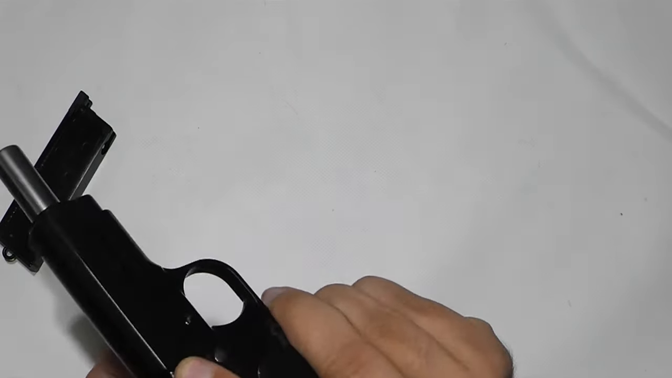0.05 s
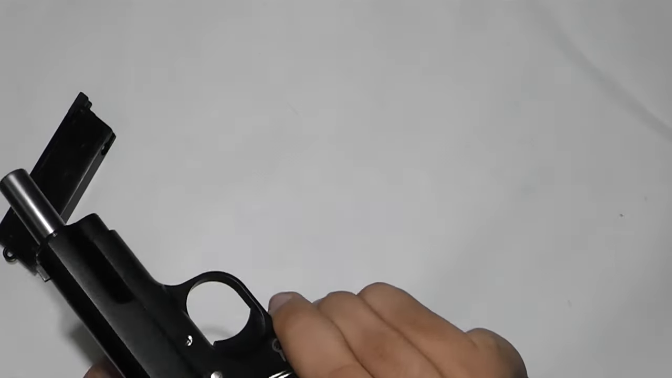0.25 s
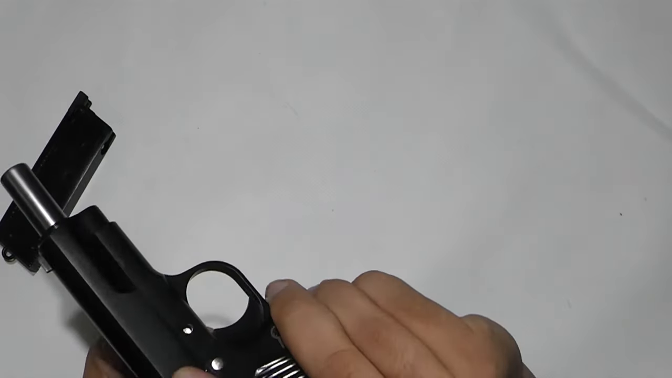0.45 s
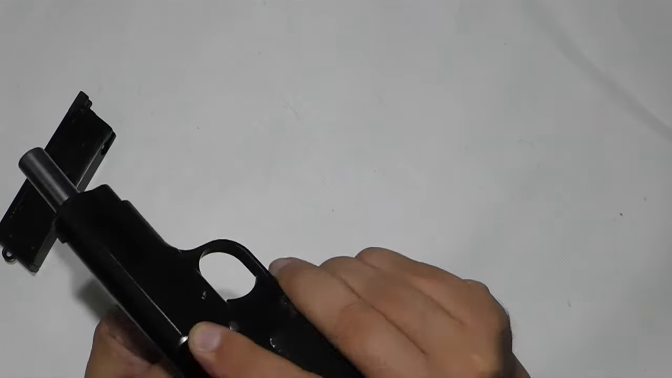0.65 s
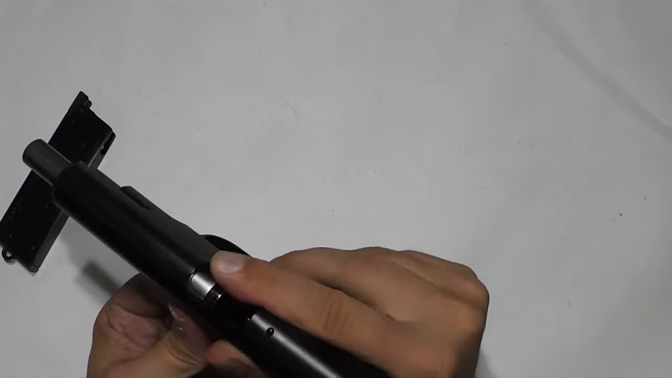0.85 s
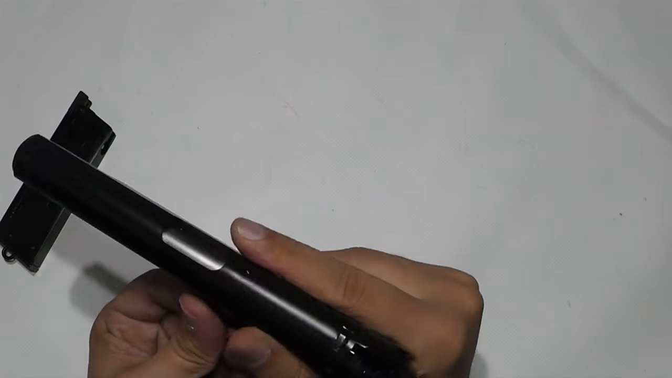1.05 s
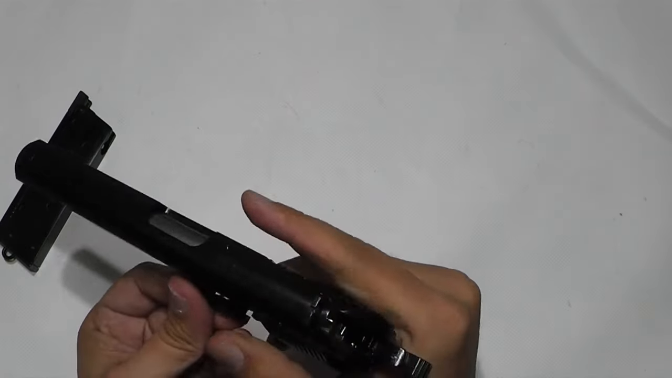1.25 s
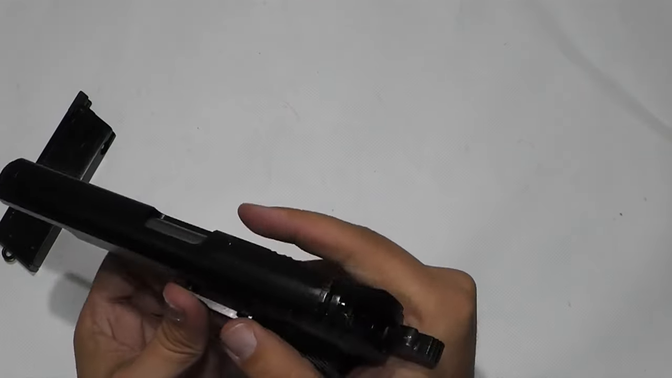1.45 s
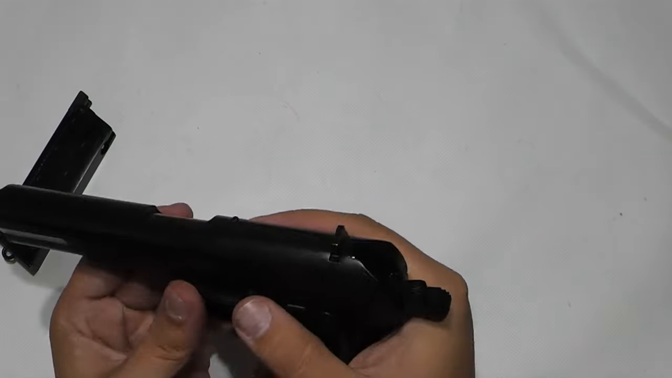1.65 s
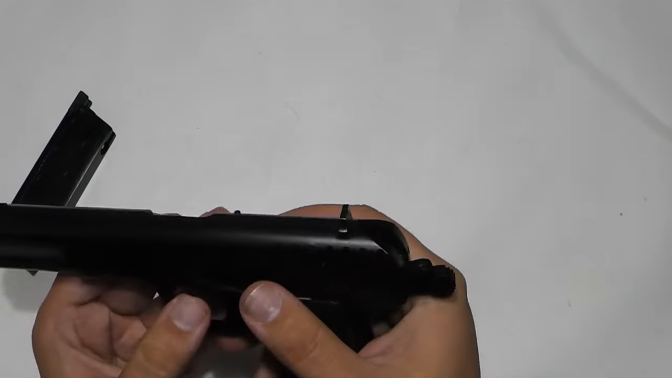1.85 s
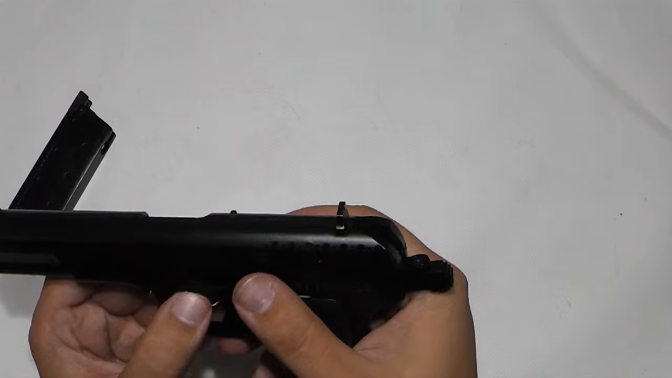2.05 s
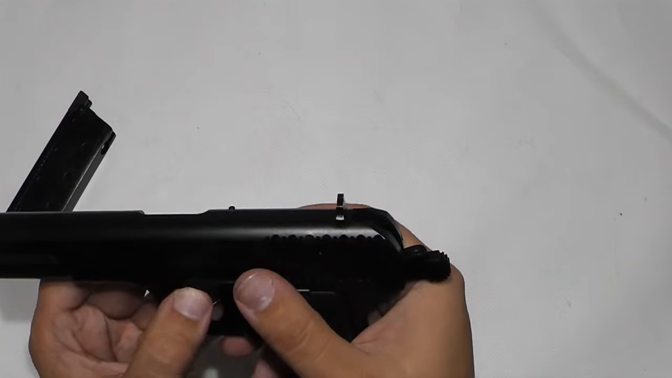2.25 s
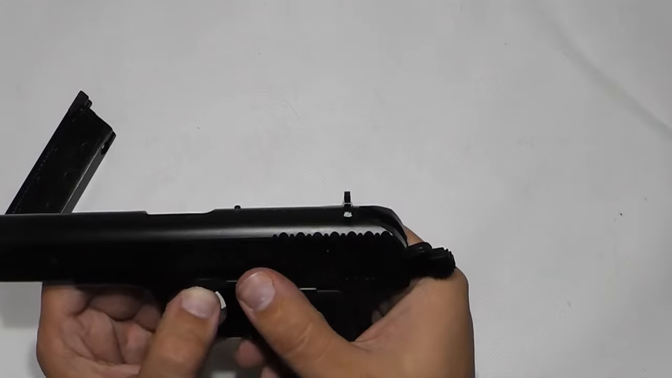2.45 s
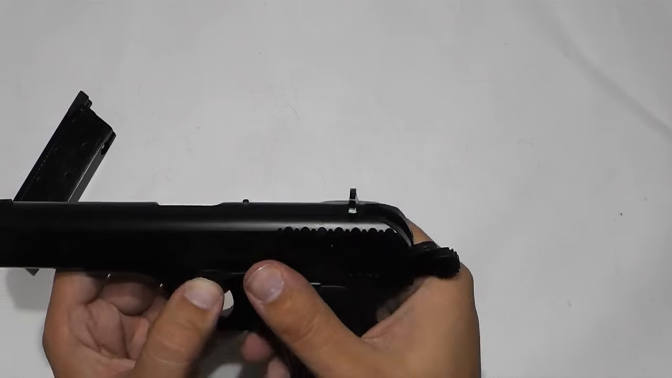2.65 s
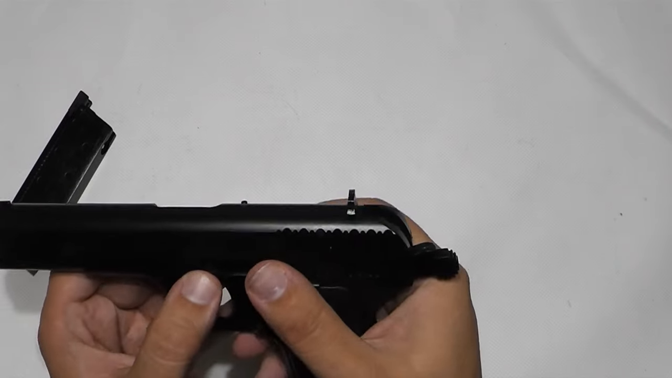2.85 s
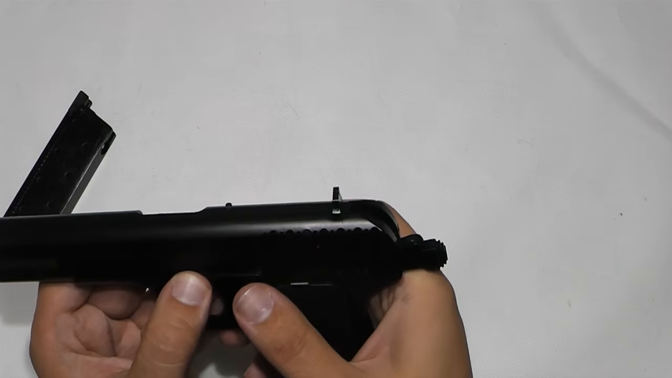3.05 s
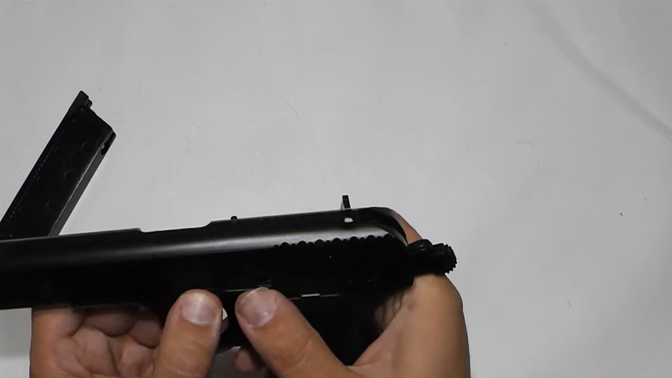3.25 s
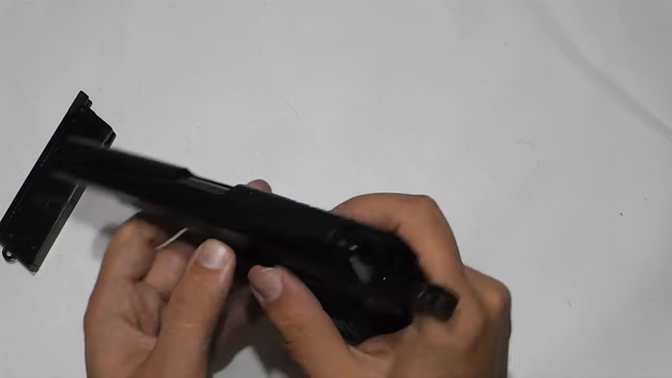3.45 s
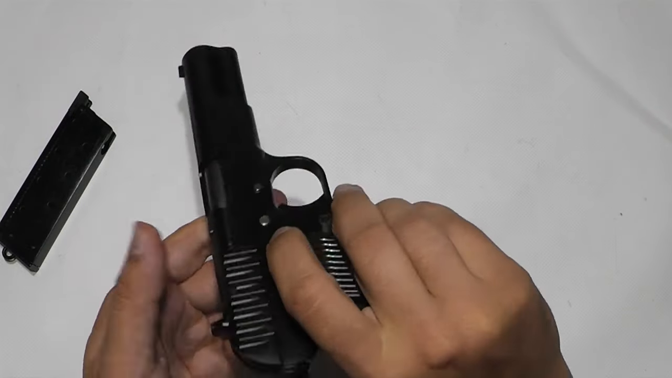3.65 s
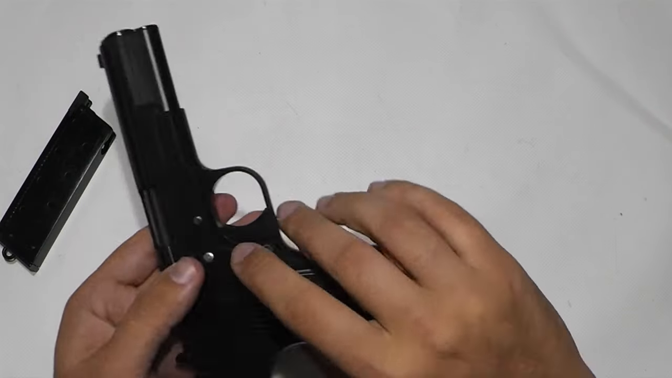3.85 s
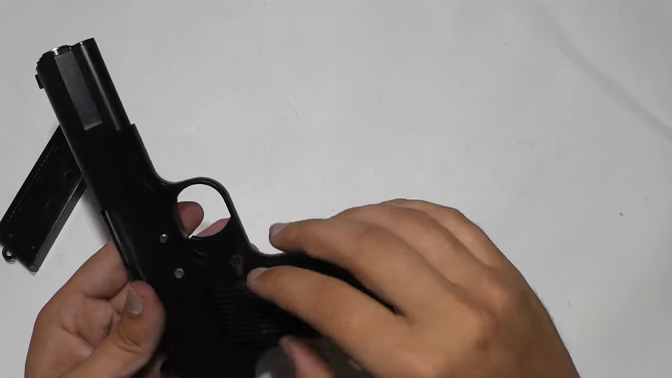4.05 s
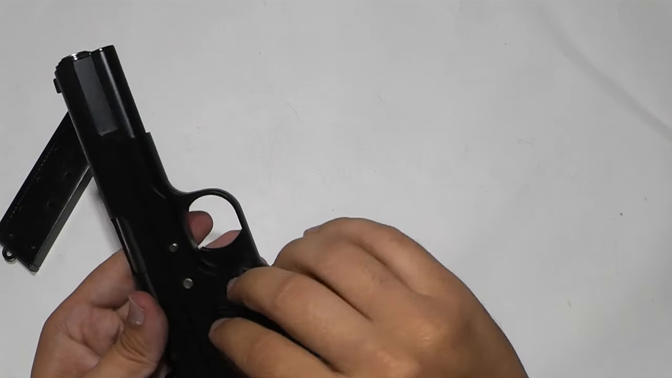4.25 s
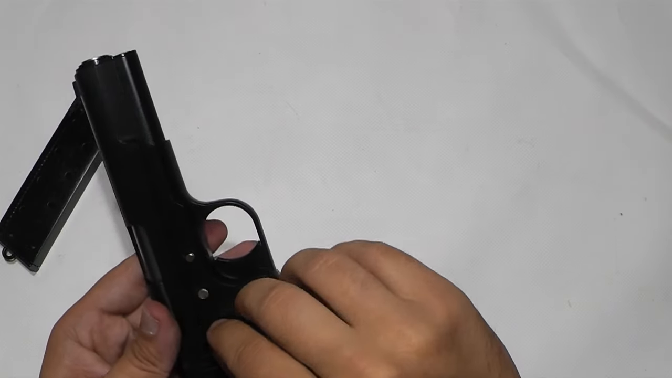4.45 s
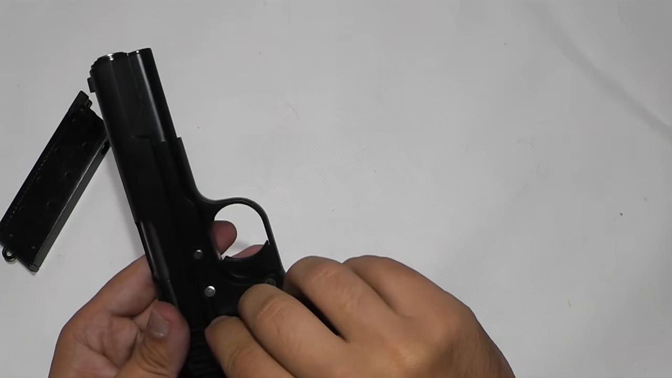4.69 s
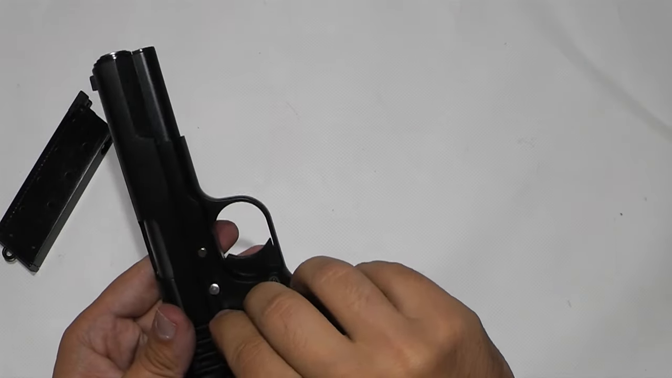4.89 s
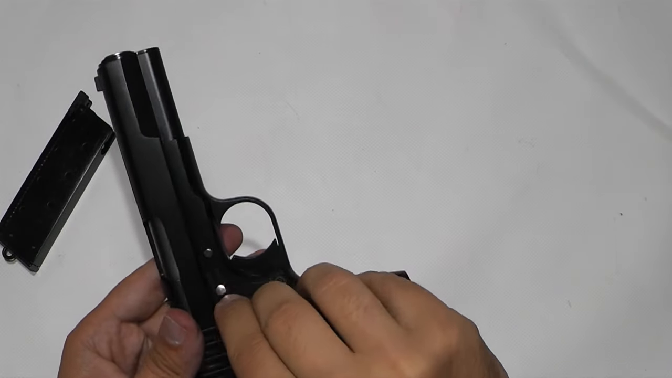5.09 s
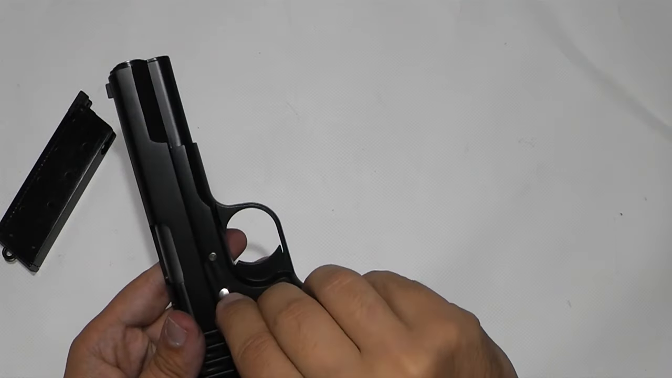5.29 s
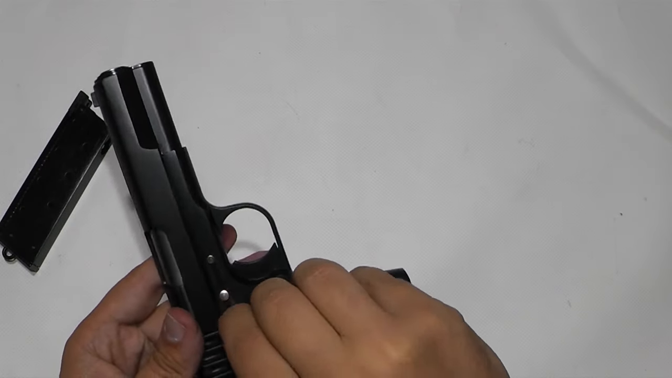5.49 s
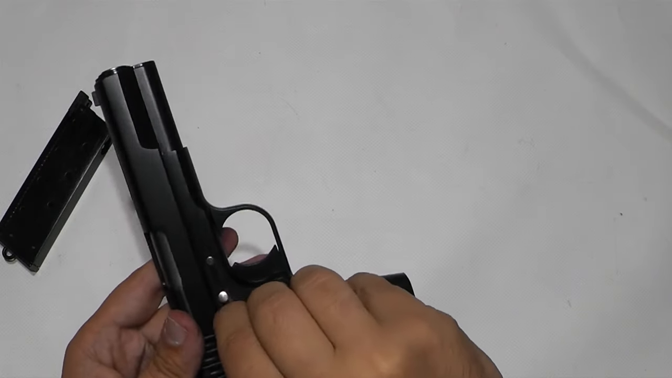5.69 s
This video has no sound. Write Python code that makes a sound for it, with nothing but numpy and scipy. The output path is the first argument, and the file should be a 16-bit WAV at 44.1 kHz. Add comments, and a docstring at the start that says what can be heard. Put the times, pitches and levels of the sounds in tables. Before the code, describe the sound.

A metal pistol is reassembled by hand in a quiet room: small ticks and rubbing, a table knock, a slide clack, a sharp snap.

```python
"""An airsoft pistol is put back together by hand in a small, dry room with a low hum and faint whine.
Parts tick and rub throughout. Early on the grip bumps the table; at about 1.2 s a creak and scrape
lead into the slide's clack, and at 3.1 s the slide stop snaps in. A last part creaks home at 5.2 s.
Hits are short bursts of random contacts that make metal ring, rubbing and room noise are coloured
noise, and reflections made of dying noise put the pistol in the room."""
import sys
import numpy as np
from scipy import signal
from scipy.fft import rfft, irfft
from scipy.io import wavfile
from scipy.ndimage import uniform_filter1d

SR = 44100
rng = np.random.default_rng(int(sys.argv[2]) if len(sys.argv) > 2 else 0)


def file_out(sig):
    """Save sig as 16-bit WAV at sys.argv[1]."""
    # one column per channel
    cols = np.atleast_2d(sig).T
    # limit, then scale
    lim = np.clip(cols, -1, 1)
    pcm = np.round(lim * 32767).astype(np.int16)
    wavfile.write(sys.argv[1], SR, pcm)


N = 252693  # length of the scene in samples
T = np.arange(SR // 2) / SR  # the half second given to each short sound, in seconds


def amp(db):
    """Turns dB into a plain factor."""
    return 10 ** (np.asarray(db) / 20)


def unit(x):
    """Scales to energy 1."""
    return x / np.sqrt(np.sum(x ** 2) + 1e-20)


def read(points, hz):
    """Reads a table between its points, along a logarithmic pitch scale."""
    f, value = np.transpose(points)
    return np.interp(np.log(hz + 1), np.log(f + 1), value)


def add(mix, s, sound):
    """Adds a sound to the mix, starting at s seconds."""
    part = mix[round(s * SR):][:len(sound)]
    part += sound[:len(part)]


def shaped(x, spectrum):
    """Gives steady noise a colour, at rms 1."""
    gain = amp(read(spectrum, np.fft.rfftfreq(N, 1 / SR)))
    return unit(irfft(rfft(x) * gain, N)) * np.sqrt(N)


def drifting(size):
    """A slowly wandering random curve, at rms 1; a larger size in samples wanders more slowly."""
    return unit(uniform_filter1d(rng.standard_normal(N), size=size)) * np.sqrt(N)


def response(spectrum, size=4096):
    """The answer of a body with this colour to one tap: nothing sounds before the tap."""
    log_gain = np.log(amp(read(spectrum, abs(np.fft.fftfreq(size, 1 / SR)))))
    minimum_phase = np.exp(np.conj(signal.hilbert(log_gain)))
    return unit(np.fft.ifft(minimum_phase).real[:size // 2])


def through(x, body):
    """Sends a short sound through a body, at energy 1."""
    return unit(signal.fftconvolve(x, body)[:len(T)])


def evened(x, width_hz=250):
    """Levels the broad humps in the spectrum of a random burst or tail, so a later colour is heard plainly."""
    z = rfft(x, 2 * len(T))
    power = uniform_filter1d(abs(z) ** 2, size=int(width_hz * 2 * len(T) / SR) + 1)
    return unit(irfft(z / np.sqrt(abs(power) + 1e-12))[:len(T)])


def dying(t60s):
    """Countless overlapping resonances or echoes: noise whose bands die at their own speeds."""
    hz, t, z = signal.stft(rng.standard_normal(len(T)), SR, nperseg=256)
    fading = z * amp(-60 * t / read(t60s, hz)[:, None])
    return signal.istft(fading, SR, nperseg=256)[1][:len(T)]


def chatter(t60, first, rise_s=0.00014):
    """A first contact, then a dying rattle of micro-contacts."""
    envelope = amp(-60 * T / t60) * (1 - np.exp(-T / rise_s))
    rattle = unit(rng.standard_normal(len(T)) * envelope)
    return unit(rattle + first * (T == 0))


def resonance(x, hz, t60, share):
    """Lets a share of the sound ring in one damped mode."""
    mode = amp(-60 * T / t60) * np.cos(2 * np.pi * hz * T)
    return x + share * through(x, mode)


def ringing(modes, t60s):
    """The strongest modes of a part, each a tone dying away."""
    tones = 0
    for hz, db in modes:
        fading = amp(db - 60 * T / read(t60s, hz))
        tones = tones + fading * np.sin(2 * np.pi * (hz * T + rng.random()))
    return unit(tones)


def strike(hits, colour, modes, t60s, modes_db, dense_db, swell_s, first):
    """Quickly repeated contacts make a crack, and feed a few strong modes and many weak ones."""
    out, force = np.zeros(N), np.zeros(len(T))
    start, body = hits[0][0], response(colour)
    for s, db, t60 in hits:
        add(force, s - start, amp(db) * chatter(t60, first))
    crack = through(evened(force, width_hz=310), body)
    strong_modes = amp(modes_db) * ringing(modes, t60s)
    weak_modes = amp(dense_db) * through(evened(dying(t60s)), body)
    swell = np.minimum(T / swell_s, 1)
    add(out, start, np.linalg.norm(force) * (crack + (strong_modes + weak_modes) * swell))
    return out


# Colour of the room noise. Each row: pitch in Hz, relative level in dB.
FLOOR = [(25, -10), (42, -9), (62, 0.6), (105, -8), (150, -18), (250, -17), (480, -22), (1100, -20),
         (2000, -27), (2650, -50), (3500, -51), (5000, -41), (10000, -50), (16000, -72)]
# Its whining tones. Each row: pitch in Hz, rms level in dB before the small left-right tilt.
TONES = [(64, -74.5), (1071, -75.5), (1222, -81)]
# How alike the two ears hear it. Each row: pitch in Hz, likeness from 0 (unrelated) to 1 (the same).
LIKENESS = [(60, 1), (130, 0.4), (290, 0.73), (1400, 0.9), (3000, 0), (16000, 0.1)]


def room_noise(floor_db=-62.0, waver_hz=3):
    """Low rumble as coloured noise, alike in both ears in the bass, and a faint wavering fan whine."""
    same = read(LIKENESS, np.fft.rfftfreq(N, 1 / SR))
    a, b = rfft(rng.standard_normal((2, N)))
    mid, side = a * np.sqrt(1 + same), b * np.sqrt(1 - same)
    air = np.array([shaped(irfft(z, N), FLOOR) for z in (mid + side, mid - side)])
    for hz, db in TONES:
        cycles = np.cumsum(hz + waver_hz * drifting(4000)) / SR
        air = air + amp(db - floor_db) * np.sqrt(2) * np.sin(2 * np.pi * cycles)
    return amp(floor_db) * air * amp([[.5], [-.5]])  # left a little louder than right


# How long the room rings. Each row: pitch in Hz, seconds to fall by 60 dB.
ROOM_T60 = [(60, 0.22), (300, 0.05), (1500, 0.2), (5000, 0.21), (9000, .195), (16000, 0.14)]
# Colour of the reflections, where the bass is weak. Each row: pitch in Hz, dB added to wet_db.
ROOM_GAIN = [(60, -11), (350, -8), (800, -2.5), (1500, -6), (3000, 2.5), (9000, -0.5), (16000, 1)]
# Extra colour of their left-right difference. Each row: pitch in Hz, dB added on top, along with side_db.
ROOM_SIDE = [(60, 8.5), (400, 8.5), (1300, 4.5), (2400, -5.5), (4400, 0.5), (8500, -3), (14000, 4.5)]


def room(x, wet_db, side_db, early=1.3, early_s=0.014, delay_s=0.0017, build_s=0.0025):
    """Direct sound plus dense reflections, the strong early ones from the table and hands."""
    onset = np.clip((T - delay_s) / build_s, 0, 1) * (1 + early * np.exp(-T / early_s))
    tails = [evened(dying(ROOM_T60) * onset, width_hz=760) for _ in range(2)]
    hz = np.fft.rfftfreq(2 * len(T), 1 / SR)
    # first row for what both ears share, second for their difference
    gain = amp(wet_db + read(ROOM_GAIN, hz)) * amp([0 * hz, side_db + read(ROOM_SIDE, hz)])
    echoes = irfft(rfft(tails, 2 * len(T)) * gain)[:, :len(T)]
    mid, side = signal.fftconvolve(x[None], echoes, axes=1)[:, :N]
    return np.array([x + mid + side, x + mid - side]) / np.sqrt(1 + amp(wet_db) ** 2)


def stroke(start, length, attack_s=0.011, release_s=0.027):
    """A hand movement sets in, holds and dies away."""
    t = np.arange(N) / SR - start
    return np.clip(t / attack_s, 0, 1) * np.exp(-np.maximum(t - length, 0) / release_s)


# The hands shifting their hold. Each row: start in seconds, length in seconds,
# rms level of rubbing metal in dB, rms level of brushing skin in dB (both before the room).
STROKES = [(0, 0.11, -75.5, -88), (0.319, .42, -67, -66.5), (0.782, .19, -68, -69),
           (1.049, .08, -68.5, -68), (3.52, 0.59, -79, -76.5), (4.17, 0.47, -101.5, -69.5),
           (4.857, 0.056, -83, -72), (5.337, 0.33, -79.5, -76)]
# Colour of metal rubbing on metal. Each row: pitch in Hz, relative level in dB.
RUB = [(150, -15), (500, -7.5), (1100, 0), (2000, 2), (2900, -22.5), (4300, 1.5), (6500, -1), (9500, -1),
       (12500, -7), (16000, -10.5)]
# Colour of the palm brushing the grip. Each row: pitch in Hz, relative level in dB.
BRUSH = [(60, -13.5), (280, 11), (600, 5.5), (1300, 9), (1900, 9), (2300, -3), (2700, -44), (5500, -20),
         (12000, -45)]
HOLD_METAL_DB, HOLD_SKIN_DB = -87.5, -70  # steady rms level of the hold before the room, under all strokes


def friction(slips_per_s=1500, spread_db=3.0, smooth=.45, uneven_db=2.0):
    """Metal slides in tiny slips under an uneven hand pressure; skin brushes smoothly."""
    sizes = amp(spread_db * np.minimum(rng.exponential(1, N), 5))
    slipping = rng.random(N) < slips_per_s / SR
    slips = rng.standard_normal(N) * (smooth + sizes * slipping)
    pressure_db = uneven_db * np.clip(drifting(900), -2, 2)
    metal = shaped(slips * amp(pressure_db), RUB)
    skin = shaped(rng.standard_normal(N), BRUSH)
    out = amp(HOLD_METAL_DB) * metal + amp(HOLD_SKIN_DB) * skin
    for start, length, metal_db, skin_db in STROKES:
        out += stroke(start, length) * (amp(metal_db) * metal + amp(skin_db) * skin)
    return out


# Parts clicking together. Each row: start in seconds, pitch of the frame's clack in Hz, pitch of the
# steel ring in Hz, clack energy in dB, ring energy in dB before ring_db is added (both before the room).
CLICKS = [(.0334, 1400, 8900, -43, -39), (0.059, 1720, 9800, -37, -37.5), (.2778, 1100, 6030, -24, -45),
          (0.5176, 1800, 5730, -21, -27), (.527, 1170, 4810, -25, -45), (0.6479, 1640, 6400, -21, -19.5),
          (0.684, 1260, 7950, -34, -36), (.882, 1330, 8400, -31, -31.5), (0.9345, 1350, 10500, -31.5, -32),
          (1.043, 1570, 10100, -38, -36.5), (1.128, 1690, 8000, -12.5, -29), (1.1315, 1624, 9180, -18, -24),
          (1.759, 1130, 8120, -55.5, -46), (1.7732, 1980, 4000, -23.5, -30),
          (1.7795, 1875, 3930, -27.5, -48), (1.889, 1510, 3420, -30, -39.5),
          (1.9351, 2024, 4100, -23.5, -23.5), (2.1, 1290, 3855, -35, -40.5), (2.113, 1885, 4500, -23, -33),
          (2.1192, 1930, 4860, -22.5, -21), (2.5684, 1224, 3700, -21, -36.5), (3.06, 1197, 4540, -45, -33),
          (3.5, 1656, 6900, -34, -37.5), (3.523, 1730, 8410, -32.5, -40.5),
          (3.6964, 1411, 6940, -27, -31.5), (4.101, 1441, 8880, -56.5, -51.5),
          (5.214, 1670, 5600, -31, -38), (5.229, 1421, 8680, -25, -29.5), (5.2368, 1290, 9800, -19.5, -15),
          (5.503, 1840, 8780, -25.5, -37.5), (5.517, 1700, 10500, -54, -43.5)]
# Colour of the frame's knock. Each row: pitch in Hz, relative level in dB.
FRAME = [(100, -21.5), (450, -17.5), (800, -4.5), (1200, 0.5), (2000, 1.5), (2900, -12.5), (5000, -30),
         (16000, -50.5)]
# Colour of the ringing steel. Each row: pitch in Hz, relative level in dB.
RING = [(2000, -41), (3100, -10), (4100, 0), (6800, 0.5), (9000, -8.5), (16000, -29.5)]
# Colour of the bright tick, before brightening. Each row: pitch in Hz, relative level in dB.
TICK = [(3000, -27.5), (6000, -8), (8200, 4), (11000, 4), (13000, -11.5), (16000, -11)]
# the smaller the part, the higher it rings and the stronger its tick;
# at EVEN_TICK_HZ the tick level equals the ring level in the table
EVEN_TICK_HZ, TICK_DB_PER_OCTAVE = 6540, 15.5
# light contacts rattle on for CHATTER_T60 seconds; those harder than FIRM_DB seat at once,
# their chatter halving every HALVING_DB
CHATTER_T60, FIRM_DB, HALVING_DB = 0.033, -18.5, 7.5


def clicks(clack_t60=0.013, ring_t60=.004, first=0.14, ring_db=-1, brighten=.4):
    """Each contact knocks the hand-damped frame, rings a steel part and gives a bright tick."""
    out = np.zeros(N)
    frame, ring = response(FRAME), response(RING)
    for s, clack_hz, ring_hz, clack_db, rung_db in CLICKS:
        tick_db = rung_db + TICK_DB_PER_OCTAVE * np.log2(ring_hz / EVEN_TICK_HZ)
        t60 = CHATTER_T60 * .5 ** (max(tick_db - FIRM_DB, 0) / HALVING_DB)
        knock, steel, tip = (evened(chatter(t60, first * CHATTER_T60 / t60), width_hz=600)
                             for _ in range(3))
        # a harder contact is briefer, so it reaches higher
        tick = response([(hz, db + brighten * (tick_db + 25) * (hz > 12000)) for hz, db in TICK])
        knock = resonance(knock, clack_hz, clack_t60, share=0.22)
        steel = resonance(steel, ring_hz, ring_t60, share=.3)
        add(out, s, amp(clack_db) * through(knock, frame))
        add(out, s, amp(rung_db + ring_db) * through(steel, ring))
        add(out, s, amp(tick_db) * through(tip, tick))
    return out


# A tight part forced in. Each row: start in seconds, end in seconds, creak level in dB (the creak climbs
# from 15 to 5 dB below it), rms level of the scrape at the end in dB (both before the room).
CREAKS = [(1.113, 1.172, -42.5, -29), (5.183, 5.234, -42.5, -46.5)]
# Colour of the creak. Each row: pitch in Hz, relative level in dB.
CREAK = [(100, -14), (450, -5.5), (850, -6), (1200, 1.5), (2100, -1.5), (3000, -20), (6000, -21.5),
         (16000, -40.5)]
# Colour of the scrape. Each row: pitch in Hz, relative level in dB.
SCRAPE = [(1000, -14), (2000, -5.5), (3000, -19), (5500, -9.5), (9300, -2), (12500, -16), (16000, -22.5)]
SCRAPE_RISE_DB_PER_S = 477.5


def creaks(slips_per_s=700, rise_db=10, drag=0.16, onset_s=.008):
    """Pressure builds; the part sticks and slips on the frame, scraping ever louder until it gives."""
    out, body, rails = np.zeros(N), response(CREAK), response(SCRAPE)
    for start, end, creak_db, scrape_db in CREAKS:
        t = T[T < end - start]
        grip = rng.standard_normal(len(t)) * np.minimum(t / onset_s, 1)
        slipping = rng.random(len(t)) < slips_per_s / SR
        slips = unit(grip * (drag + slipping)) * np.sqrt(len(t))
        creak = slips * amp(creak_db + rise_db * (t / t[-1] - 1.5))
        scrape = grip * amp(scrape_db - SCRAPE_RISE_DB_PER_S * (t[-1] - t))
        add(out, start, signal.fftconvolve(creak, body))
        add(out, start, signal.fftconvolve(scrape, rails))
    return out


# The grip meeting the table. Each row: start in seconds, energy of the contact in dB,
# seconds for its chatter to fall by 60 dB.
TABLE_HITS = [(.2867, -3, 0.0074), (.2888, -1.5, 0.015), (.2968, -15.5, 0.03), (.301, -7, 0.035)]
# Colour of the contact. Each row: pitch in Hz, relative level in dB.
TABLE = [(25, -7), (200, 1), (350, 2), (600, 6), (950, -3.5), (1500, 1.5), (2200, -11.5), (3200, -24.5),
         (4800, -13.5), (9000, -18.5), (16000, -32)]
# Its strongest modes. Each row: pitch in Hz, relative level in dB.
TABLE_MODES = [(113, -3), (260, -29.5), (350, 7.5), (458, 3), (575, -18), (619, -15), (690, -1), (764, 7),
               (937, 0.5), (1040, -7), (1211, -16), (1400, -8), (1510, -24)]
# How long it rings. Each row: pitch in Hz, seconds to fall by 60 dB.
TABLE_T60 = [(110, 0.7), (350, 0.25), (700, 0.16), (1500, 0.16), (5000, 0.12)]


def table_bump():
    """The grip bumps the table: mostly low modes, with a strong first contact."""
    return strike(TABLE_HITS, TABLE, TABLE_MODES, TABLE_T60,
                  modes_db=-5.5, dense_db=-4.5, swell_s=0.0022, first=0.74)


# The slide stop's contacts. Each row: start in seconds, energy of the contact in dB,
# seconds for its chatter to fall by 60 dB.
STOP_HITS = [(3.0778, 1, 0.044), (3.0818, 2.5, 0.023), (3.0858, 1.5, 0.047), (3.0965, -2, 0.026)]
# Colour of the contact. Each row: pitch in Hz, relative level in dB.
STOP = [(25, 5), (150, 1), (230, -1), (430, 6), (700, -3.5), (950, 3), (1300, 2.5), (1900, 1.5), (2300, -9),
        (3400, -11), (4500, -2), (10200, 3), (12300, -4), (16000, -11)]
# Its strongest modes. Each row: pitch in Hz, relative level in dB.
STOP_MODES = [(360, 7), (460, -6.5), (554, -12), (1216, -1.5), (1749, -0.5), (1954, -2.5), (4010, -2.5),
              (4371, -9.5), (4470, -10), (4898, -11.5), (5108, -3), (5447, -1), (6957, -18), (7044, -10),
              (7227, -9.5), (7418, -9), (7795, -4), (7910, -10), (8161, -5.5), (8432, 3), (8842, 2),
              (9200, -8.5), (9375, 3.5), (9611, 2.5), (9819, -1.5), (10298, -4.5), (10478, -2),
              (10858, -9.5)]
# How long it rings. Each row: pitch in Hz, seconds to fall by 60 dB.
STOP_T60 = [(400, 0.054), (1000, 0.12), (1700, 0.12), (5000, 0.19), (10000, 0.13), (16000, .15)]


def stop_snap():
    """The slide stop snaps in: a rattle of four contacts sets low and high modes ringing."""
    return strike(STOP_HITS, STOP, STOP_MODES, STOP_T60,
                  modes_db=-2, dense_db=2.8, swell_s=0.004, first=0.041)


# The slide's contacts as it runs home. Each row: start in seconds, energy of the contact in dB,
# seconds for its chatter to fall by 60 dB.
SLIDE_HITS = [(1.1712, -6, 0.0045), (1.1727, 1.5, 0.033), (1.1775, 5, 0.05), (1.1875, -3, 0.022)]
# Colour of the contact. Each row: pitch in Hz, relative level in dB.
SLIDE = [(25, -1.5), (75, 3), (160, 6.5), (270, -9.5), (500, -4.5), (700, 2), (950, -1), (1500, 0),
         (2600, -7), (4300, -2), (7500, 3), (10800, 1.5), (12500, -6.5), (16000, -11.5)]
# Its strongest modes. Each row: pitch in Hz, relative level in dB.
SLIDE_MODES = [(672, -7.5), (890, -5), (1065, -0.5), (1254, -6), (1394, -4.5), (1768, -5), (1964, -10.5),
               (3558, -8), (4610, -6), (5264, -7.5), (5388, -2), (6080, -5), (6250, -5.5), (6473, -1),
               (6624, 1), (6761, -1), (6882, -5.5), (7332, 0), (7601, 1.5), (7700, 1), (7964, 2),
               (8336, -0.5), (8699, -4.5), (8831, -3), (9461, -7.5), (10023, -5.5), (10483, -2.5),
               (10739, -6.5)]
# How long it rings. Each row: pitch in Hz, seconds to fall by 60 dB.
SLIDE_T60 = [(300, .05), (700, 0.07), (1500, 0.18), (6000, 0.19), (10000, .16), (16000, .13)]


def slide_clack():
    """The slide runs home with a clack: four contacts close together make the metal ring."""
    return strike(SLIDE_HITS, SLIDE, SLIDE_MODES, SLIDE_T60,
                  modes_db=-5, dense_db=3.5, swell_s=.004, first=.1)


def scene():
    """Puts every source in the room and adds the room noise."""
    handling = room(friction(), wet_db=-1.0, side_db=1)
    handling += room(clicks() + creaks(), wet_db=-7.0, side_db=-3.0)
    blows = room(table_bump(), wet_db=-11.5, side_db=-2.5)
    blows += room(stop_snap(), wet_db=-4.5, side_db=-2.5)
    blows += room(slide_clack(), wet_db=-13.0, side_db=2)
    return room_noise() + handling + blows


def record(dry, ceiling=.6, edge_hz=16100):
    """The recorder rounds off the highest peaks, then cuts what lies above its band limit."""
    rounded = ceiling * np.tanh(dry / ceiling)
    band_limit = signal.firwin(255, edge_hz, window=("kaiser", 9), fs=SR)
    return signal.oaconvolve(rounded, band_limit[None], "same")


dry = scene()
out = record(dry)
file_out(out)
```